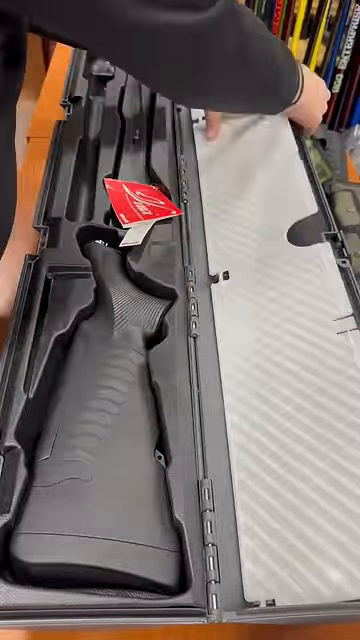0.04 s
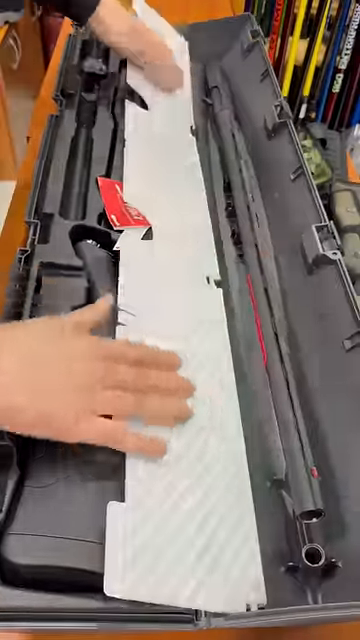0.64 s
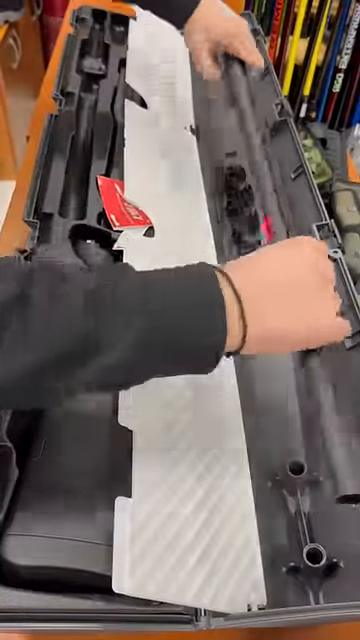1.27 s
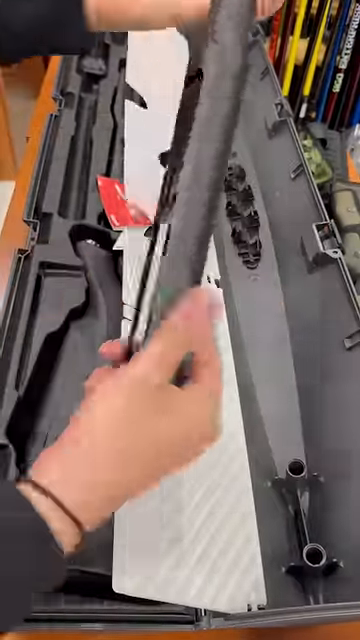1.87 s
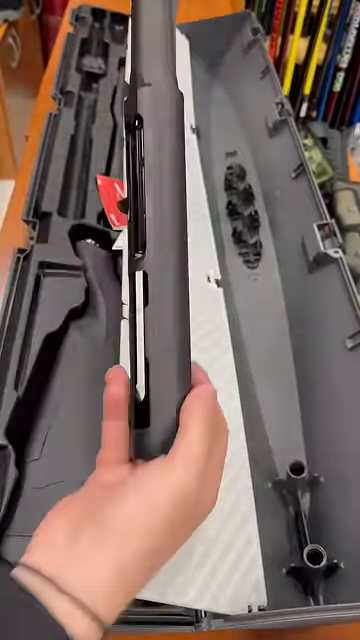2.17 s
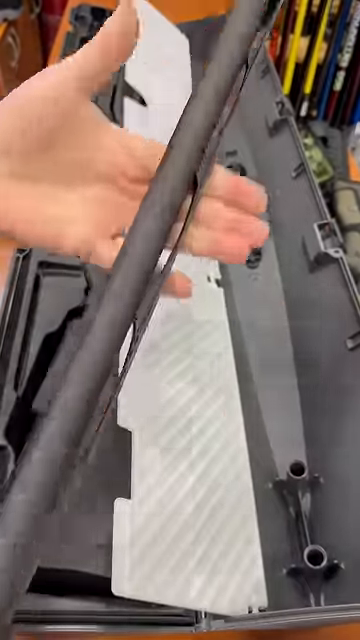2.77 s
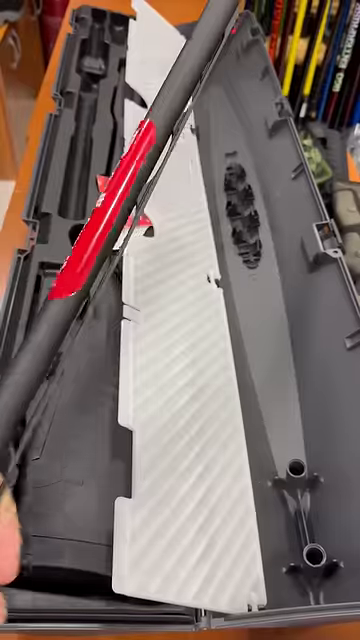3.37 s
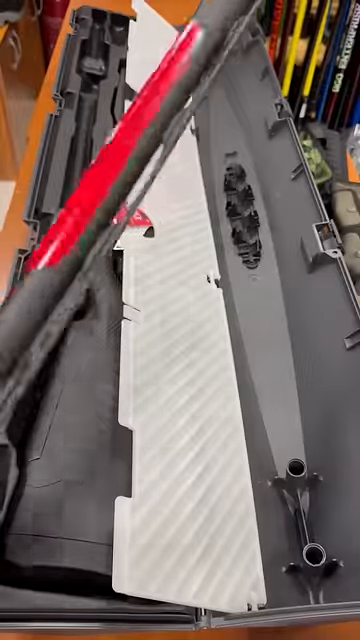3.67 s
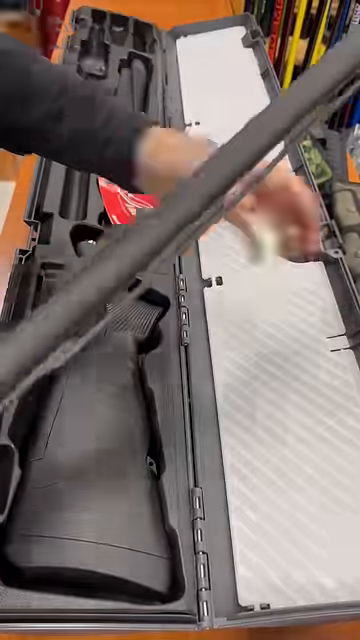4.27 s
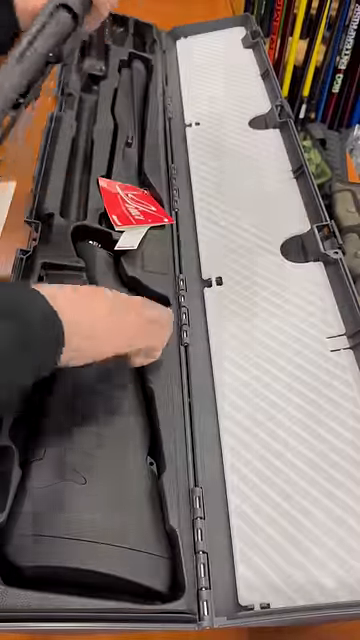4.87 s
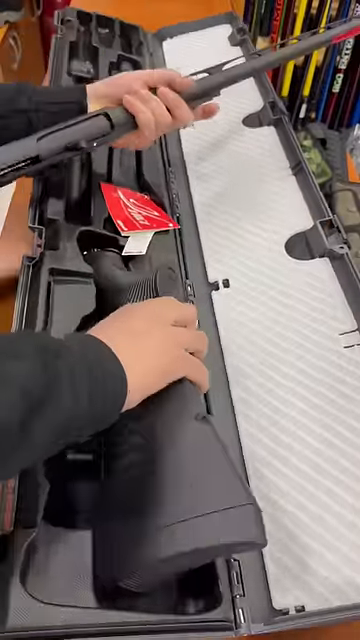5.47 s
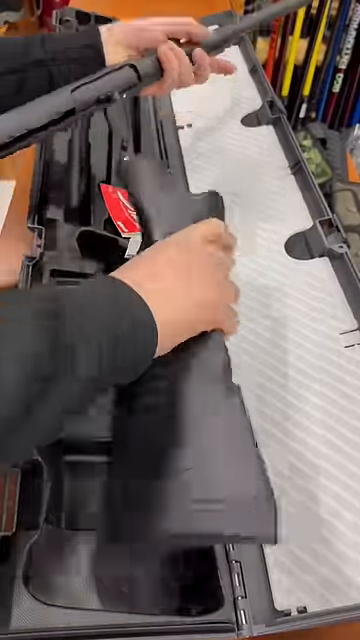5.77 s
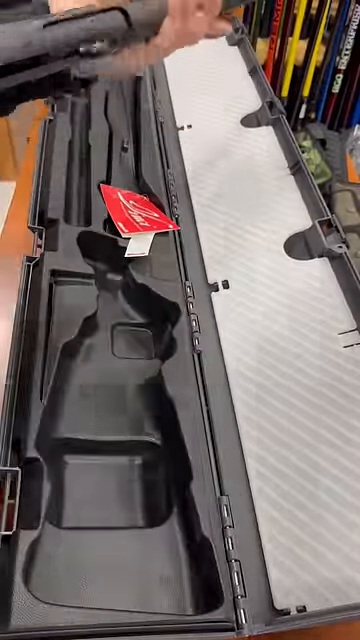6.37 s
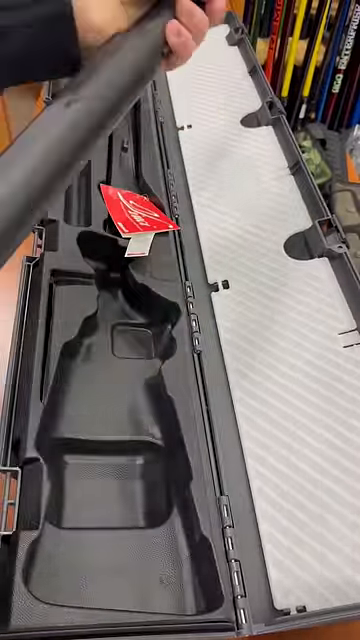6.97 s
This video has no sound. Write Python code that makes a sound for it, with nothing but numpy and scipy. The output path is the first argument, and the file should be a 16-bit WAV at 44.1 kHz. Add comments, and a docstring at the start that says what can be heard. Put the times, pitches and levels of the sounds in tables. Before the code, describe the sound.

At the start, a stiff divider sheet rubs and knocks in an open plastic gun case, slapping the lid sharply at 0.3 seconds and knocking again near 0.6. Light taps follow around 1 second. From 1.3 to 3.8 it is much quieter: hands and sleeve slide over a steel barrel with a soft hiss, dull bumps and, near 3.6, a few tiny clicks. From 3.9 the sheet scrapes and clatters back, landing with a loud slap and brief chatter at 4.2. Between 4.9 and 5.8 the stock is pulled from its tray with hollow knocks, rasps and short squeaks, loudest near 5.3. Hands rub again from 6, steel clicks near 6.5, and a sharp click with a knock lands at 7. Everything sounds close, with a brief shop echo and a faint, steady ventilation hum underneath.

```python
"""A moulded plastic gun case, open on a shop counter, cracks and rings under knocks: a stiff divider sheet
is flipped and slaps the lid, is flipped back, and the stock is pulled from its tray, scraping and rubbing.
Between the flips a steel barrel slides through the hands with a hiss of skin and sleeve and faint squeaks.
Small steel parts click. Case and clicks echo briefly in the shop, where a ventilation motor hums."""
import sys
import numpy as np
from scipy import signal
from scipy.fft import rfft, irfft
from scipy.io import wavfile

SR = 44100
rng = np.random.default_rng(int(sys.argv[2]) if len(sys.argv) > 2 else 0)


def wav_out(sig):
    """Save sig, one row per channel (or a flat mono array), as 16-bit PCM at SR to the path in sys.argv[1]."""
    wavfile.write(sys.argv[1], SR, np.round(np.clip(np.atleast_2d(sig).T, -1, 1) * 32767).astype(np.int16))


N = 310464
CUTOFF_HZ = 15900
EDGES_HZ = 31.25 * 2 ** np.arange(0, 9.1, .5)
CENTRES_HZ = np.sqrt(EDGES_HZ[1:] * EDGES_HZ[:-1])


def from_db(db):
    """Decibels to gain."""
    return 10 ** (np.asarray(db) / 20)


def unit_rms(x):
    """Scale to rms 1."""
    return x / np.sqrt(np.mean(x ** 2) + 1e-20)


def unit_energy(x):
    """Scale each row to energy 1."""
    return x / np.sqrt(np.sum(x ** 2, axis=-1, keepdims=True) + 1e-20)


def at_hz(points, hz):
    """Interpolate a table over log frequency."""
    freq_hz, value = np.transpose(points)
    return np.interp(np.log(hz), np.log(freq_hz), value)


def add(track, start_s, sound):
    """Mix a sound in at start_s."""
    at = max(round(start_s * SR), 0)
    track[..., at:at + sound.shape[-1]] += sound[..., :max(N - at, 0)]


def band(x, index):
    """Half-octave band-pass."""
    return signal.sosfilt(signal.butter(2, EDGES_HZ[index:index + 2], "band", fs=SR, output="sos"), x)


def drift(rate_hz):
    """Random curve through unit-variance knots."""
    knots = rng.standard_normal(2000)
    return np.interp(np.arange(N) / SR * rate_hz, np.arange(len(knots)), knots)


def swells(rows):
    """Pressure builds and lets go: one Hann window per row, 1.4 times its nominal length."""
    force = np.zeros(N)
    for middle_s, length_s, level_db in rows:
        window = signal.windows.hann(int(1.4 * length_s * SR))
        add(force, middle_s - .7 * length_s, from_db(level_db) * window)
    return force


def friction(slips_per_s, spread_db=0):
    """Two trains of tiny slips of uneven size."""
    slips = rng.random(N) < slips_per_s / SR
    sizes = from_db(spread_db * np.minimum(rng.exponential(1, N), 4))
    return slips * sizes * rng.standard_normal((2, N))


# stereo width: freq_hz, side_db
WIDTH = [(60, -35), (250, -27), (500, -16), (1200, -7), (2200, -10), (4000, -7), (8000, -7), (13000, -5)]
def stereo(mid, side, hz):
    """Mid and side to left and right."""
    width = from_db(at_hz(WIDTH, hz))
    return np.stack([mid + width * side, mid - width * side])


def coloured(pair, tone, wider_db=0):
    """Two independent noises to one stereo noise of the given spectrum, rms 1."""
    hz = np.maximum(np.fft.rfftfreq(N, 1 / SR), 1)
    mid, side = rfft(pair) * from_db(at_hz(tone, hz)) * (hz > 20) * (hz < CUTOFF_HZ)
    return unit_rms(irfft(stereo(mid, from_db(wider_db) * side, hz), N))


def place(rows, sounds, window_s=.01):
    """Mix each sound in at its row's start; energy 1 becomes that of rms 1 over window_s."""
    out = np.zeros((2, N))
    for k, row in enumerate(rows):
        add(out, row[0], sounds[:, k] * np.sqrt(window_s * SR))
    return out


def crack(rows, drive, tone, t60s, bend_s):
    """Dense, heavily damped modes; bending waves bring the lows later (rise time bend_s at 1 kHz)."""
    t, sounds = np.arange(SR // 8) / SR, 0
    for k, hz in enumerate(CENTRES_HZ):
        rise = 1 - np.exp(-(t / (bend_s * 1000 / hz)) ** 2)
        envelope = rise * from_db(-60 * t / at_hz(t60s, hz))
        mid, side = unit_energy(band(rng.standard_normal((2, len(rows), len(t))) * envelope, k))
        strength = from_db(drive(rows, hz) + at_hz(tone, hz))
        sounds = sounds + stereo(mid, side, hz) * strength[:, None]
    return place(rows, sounds)


def ring(rows, drive, modes, scatter_db, build_cycles):
    """Each blow rings the modes; random strengths and phases stand for where it lands."""
    t, sounds = np.arange(SR // 4) / SR, 0
    for hz, level_db, t60_s in modes:
        rise = 1 - np.exp(-t * hz / build_cycles)
        envelope = unit_energy(rise * from_db(-60 * t / t60_s))
        phase_cycles = hz * t + rng.random((2, len(rows), 1))
        mid, side = np.sqrt(2) * envelope * np.sin(2 * np.pi * phase_cycles)
        strength = from_db(drive(rows, hz) + level_db + scatter_db * rng.standard_normal(len(rows)))
        sounds = sounds + stereo(mid, side, hz) * strength[:, None]
    return place(rows, sounds)


# air spectrum: freq_hz, gain_db
AIR_TONE = [(25, -39.5), (50, -26), (75, -7), (110, -6.5), (200, -5), (300, -12.5), (500, -18.5),
            (800, -25.5), (1100, -36.5), (1500, -37.5), (2200, -43.5), (7000, -50.5), (12000, -56.5),
            (16000, -59)]
# motor overtones: pitch_hz, rms_db
HUM = [(83.8, -59.5), (122, -61), (168, -68.5), (226, -72.5), (250.6, -71.5), (334, -73.5), (424.5, -76),
       (501, -84), (585, -82)]
def ventilation(motor_hz=40.9, motor_db=-68, waver_db=1.5, wander_rad=.7):
    """A steady motor note and wavering overtones over a soft rush of air."""
    t = np.arange(N) / SR
    hum = from_db(motor_db) * np.sin(2 * np.pi * motor_hz * t)
    for hz, rms_db in HUM:
        gain = from_db(rms_db + waver_db * drift(11))
        hum += gain * np.sin(2 * np.pi * hz * t + wander_rad * drift(8.2))
    air = from_db(-60) * coloured(rng.standard_normal((2, N)), AIR_TONE, wider_db=12.5)
    return np.sqrt(2) * hum + air


# echo decay: freq_hz, t60_s
SHOP_T60 = [(100, 0.4), (400, 0.2), (1500, 0.1), (5000, 0.24), (14000, 0.29)]
# echo strength: freq_hz, gain_db
SHOP_TONE = [(100, -7), (400, -8.5), (1500, -14.5), (5000, -13), (14000, -14)]
def shop_echo(x):
    """Short diffuse echo from counter and shelves, dying band by band."""
    t, echo = np.arange(SR // 2) / SR, 0
    arrival = np.clip((t - .006) / .0072, 0, 1)
    for k, hz in enumerate(CENTRES_HZ):
        envelope = arrival * from_db(-60 * t / at_hz(SHOP_T60, hz))
        mid, side = unit_energy(band(rng.standard_normal((2, len(t))) * envelope, k))
        band_share = np.sqrt(2 * (EDGES_HZ[k + 1] - EDGES_HZ[k]) / SR)
        echo = echo + stereo(mid, side, hz) * band_share * from_db(at_hz(SHOP_TONE, hz))
    return signal.fftconvolve(x.mean(axis=0, keepdims=True), echo, axes=1)[:, :N]


# handling bumps: middle_s, length_s, level_db
BUMPS = [(2.18, 0.12, -51.5), (2.73, .1, -52), (3.06, 0.13, -52.5), (3.61, .1, -53), (4.5, 0.19, -54),
         (6.23, 0.089, -49.5), (6.55, 0.14, -53)]
def bumps():
    """Handling makes soft swells of low noise."""
    tone_hz_db = [(100, -24), (165, 3), (205, 4), (300, -15), (1000, -61)]
    return swells(BUMPS) * coloured(rng.standard_normal((2, N)), tone_hz_db)


# squeaks: middle_s, length_s, pitch_hz, relative_db
SQUEAKS = [(0.145, 0.017, 4170, -37), (1.807, .06, 3100, -73.5), (0.583, 0.0075, 3630, -38.5),
           (4.063, 0.019, 1380, -39.5), (5.023, 0.0047, 2250, -34), (5.252, 0.058, 2720, -45.5),
           (5.798, .03, 2920, -75), (5.93, 0.052, 3050, -68), (6.086, 0.038, 3000, -63.5)]
def squeaks(half_width_hz=300):
    """Fingers and plastic edges stick and slip at a loosely held pitch."""
    out = 0
    for middle_s, length_s, hz, db in SQUEAKS:
        narrow = signal.butter(2, [hz - half_width_hz, hz + half_width_hz], "band", fs=SR, output="sos")
        squeal = unit_rms(signal.sosfilt(narrow, rng.standard_normal(N)))
        out = out + swells([(middle_s, length_s, db)]) * squeal
    return from_db(5.5) * out


# strokes over the matte finish: middle_s, length_s, relative_db, grip_offset_db
STROKES = [(0.041, 0.057, -67, 11.5), (0.48, 0.19, -69, 5.5), (0.915, .2, -76, 1),
           (1.345, 0.19, -72.5, -1.5), (1.573, 0.082, -66, -7), (1.766, 0.25, -68, -4.5),
           (1.967, 0.3, -59, -11.5), (2.293, 0.16, -61.5, -16), (3.014, 0.12, -68.5, -16),
           (3.603, 0.22, -72, -17), (3.695, 0.17, -69, 10), (4.17, .3, -79, 14.5), (4.425, 0.15, -66, -0.5),
           (4.653, .13, -63.5, -7.5), (4.944, 0.22, -75.5, 11), (5.427, 0.076, -72, 9.5),
           (5.715, 0.44, -72, 0.5), (5.924, 0.087, -69, 3), (6.107, 0.22, -58.5, 1),
           (6.33, 0.21, -68.5, 4.5), (6.612, 0.077, -65.5, 3), (6.8, 0.29, -73.5, 5)]
# barrel turning in the palm: middle_s, length_s, level_db
TURNS = [(1.68, 0.17, -75), (2.0, 0.56, -69), (2.65, 0.24, -70)]
# slide, grip and palm spectra: freq_hz, gain_db
HISS_TONE = [(1000, -38.5), (4000, -15), (7000, -5), (8300, -8), (10500, 3), (13000, 0.5), (15500, -1),
             (16000, -4)]
GRIP_TONE = [(600, 3), (2000, -1.5), (3000, 0.5), (4200, -1), (6000, -1.5), (9000, -15), (16000, -29.5)]
PALM_TONE = [(200, -14), (600, 5), (1400, -6.5), (2200, -26), (6000, -30)]
def hands(rough_db=3, catch_rate_hz=66):
    """Skin and sleeve catch and slide: fine hiss, coarser under a tight grip, and dull palm rubs."""
    catching = from_db(rough_db * drift(catch_rate_hz))
    slide_force = swells([(s, length_s, db) for s, length_s, db, _ in STROKES])
    grip_force = swells([(s, length_s, db + grip_db) for s, length_s, db, grip_db in STROKES])
    hiss = slide_force * coloured(rng.standard_normal((2, N)), HISS_TONE)
    grip = grip_force * coloured(friction(slips_per_s=3900), GRIP_TONE)
    palm = swells(TURNS) * coloured(rng.standard_normal((2, N)), PALM_TONE, wider_db=11)
    return catching * (from_db(2) * hiss + from_db(-2) * grip + palm)


def click_drive(rows, hz, floor_hz=1400, pivot_hz=4200):
    """Drive of each click at hz, in dB: smaller parts are brighter."""
    _, db, brightness = np.transpose(rows)
    return db + brightness * np.log2(max(hz, floor_hz) / pivot_hz)


# steel contacts: start_s, drive_db, brightness_db_per_octave
CLICKS = [(3.4477, -79, 7.5), (3.6385, -57.5, 2), (3.6831, -57, -4.5), (3.726, -58, -6), (3.7405, -63, -5),
          (4.4698, -45, 4), (4.6908, -52, -3), (4.7133, -58.5, -8.5), (6.4708, -49.5, 3.5),
          (6.4862, -44, 0), (7.0168, -38, 4.5)]
# steel modes: pitch_hz, gain_db, t60_s
STEEL_MODES = [(756, -22, 0.019), (1600, -14, 0.005), (2020, -14.5, 0.027), (3014, -8, 0.047),
               (3800, -15, 0.017), (4030, -31, 0.016), (5030, -12, 0.0096), (5460, -17, 0.015),
               (7030, -17, 0.0099), (10930, -11, 0.011), (12200, -19, 0.01)]
# click spectrum: freq_hz, gain_db
STEEL_TONE = [(100, -29.5), (500, -35), (1500, -11.5), (2200, -4.5), (3200, 7.5), (5500, 1.5), (8200, -8),
              (11000, 4.5), (16000, 0)]
# click decay: freq_hz, t60_s
STEEL_T60 = [(500, 0.051), (3000, 0.011), (6000, 0.05), (14000, 0.02)]
def steel():
    """Loose steel parts tap each other, damped by the hand, slightly left of centre."""
    cracks = from_db(-3) * crack(CLICKS, click_drive, STEEL_TONE, STEEL_T60, bend_s=.001)
    pings = from_db(2) * ring(CLICKS, click_drive, STEEL_MODES, scatter_db=6, build_cycles=2.5)
    return from_db([[.9], [-.9]]) * (cracks + pings)


# rubbing envelopes, one list per move: time_s, relative_db
RUBBING = [
    [(0.0, -39), (0.17, -58.5), (0.306, -69.5), (0.472, -58.5), (0.54, -51.5), (0.67, -74), (0.8, -77.5)],
    [(3.85, -73.5), (3.932, -66), (3.99, -47), (4.12, -46.5), (4.17, -65), (4.322, -57), (4.45, -75)],
    [(4.8, -87), (4.918, -62.5), (5.038, -46.5), (5.118, -55), (5.534, -49.5), (5.592, -44), (5.726, -67),
     (5.85, -86)],
]
# rubbing spectrum: freq_hz, gain_db
RUB_TONE = [(100, 1.5), (400, 5), (700, -0.5), (1100, 4), (1900, -5.5), (3000, -18), (6000, -27),
            (16000, -41.5)]
def rubbing():
    """Sheet and stock rub lightly in the case."""
    t = np.arange(N) / SR
    force = sum(from_db(np.interp(t, *np.transpose(move), left=-140, right=-140)) for move in RUBBING)
    return from_db(-1.5) * force * coloured(friction(slips_per_s=3600, spread_db=2), RUB_TONE)


# plastic on plastic: middle_s, length_s, relative_db
SCRAPES = [(.148, 0.017, -25.5), (.94, 0.11, -65), (1.06, 0.27, -72), (5.27, 0.075, -41),
           (5.638, 0.031, -46.5)]
# scrape spectrum: freq_hz, gain_db
SCRAPE_TONE = [(100, -11.5), (500, 0), (1500, 8), (2500, -5.5), (4500, -2.5), (8300, -14), (12000, -10.5),
               (16000, -18)]
def scrapes():
    """An edge drags along the tray in short rasps."""
    return from_db(2) * swells(SCRAPES) * coloured(friction(slips_per_s=8700), SCRAPE_TONE)


# runs of taps: start_s, gap_s, first_drive_db
CHATTERS = [(0.285, 0.025, -43), (0.99, .04, -50), (3.966, 0.018, -44), (4.264, .022, -35),
            (4.888, 0.024, -41)]
def chatter_taps(count=5, loss_db=3.5, weight_db=-4, softness_db_per_octave=11.5):
    """A disturbed part chatters to rest: knock rows, unevenly spaced and ever weaker."""
    jitter = rng.uniform(-.1, .32, (len(CHATTERS), count))
    jitter[:, 0] = 0
    return [(start_s + gap_s * (k + jitter[i, k]), db - loss_db * k, weight_db, softness_db_per_octave)
            for i, (start_s, gap_s, db) in enumerate(CHATTERS) for k in range(count)]


def knock_drive(rows, hz, panel_hz=480, wall_hz=1400, tick_hz=5000):
    """Drive of each knock at hz, in dB: weight bends the broad panels, soft contact loses treble."""
    _, db, weight_db, softness = np.transpose(rows)
    bass_octaves = max(np.log2(panel_hz / hz), 0)
    treble_octaves = np.log2(np.clip(hz, wall_hz, tick_hz) / wall_hz)
    top_octaves = max(np.log2(hz / tick_hz), 0)
    panel_share = np.clip(np.log(wall_hz / hz) / np.log(wall_hz / panel_hz), 0, 1)
    panel_share *= max(1 - .35 * bass_octaves, 0)
    loss_db = 7.5 * bass_octaves + softness * treble_octaves + 6.5 * top_octaves
    return db + weight_db * panel_share - loss_db


def resonate(x, modes, lift_db):
    """A body lifts friction noise at each of its modes."""
    out = x
    for hz, db, t60_s in modes:
        width_hz = np.log(1000) / (np.pi * t60_s)
        peak = signal.iirpeak(hz, hz / width_hz, fs=SR)
        out = out + from_db(lift_db + db) * signal.lfilter(*peak, x + 1e-18)
    return out


# knocks: start_s, drive_db, weight_db, softness_db_per_octave
# sheet flipped 0-0.7 s, barrel lifted 0.9-1.6 s, sheet back 3.9-4.4 s,
# stock pulled out 4.9-6 s, stock meets receiver 7 s
KNOCKS = [ (0.0464, -30.5, -16, 16), (0.102, -28.5, -15, 10), (0.1294, -34, 9, 0.5),
          (0.155, -36.5, 16.5, 1.5), (0.2048, -21, -12.5, 19.5), (0.2619, -12, -3, 9.5),
          (0.5631, -29.5, -4.5, 6), (0.582, -23.5, -6, 12), (0.674, -55, 21.5, 13), (0.8959, -50, -14, 9.5),
          (0.91, -47.5, 4.5, 7), (0.9602, -51.5, -3, 4), (1.644, -66, 6, 4.5), (3.9245, -42, 17.5, 11.5),
          (3.9461, -34, 4.5, 14), (4.0141, -41.5, 5.5, 26), (4.0554, -33, -2.5, 25.5),
          (4.0847, -30, -9.5, 10.5), (4.228, -27.5, -5, 4.5), (4.2367, -15.5, -3.5, 12.5),
          (4.2429, -26, 18, 3), (4.3537, -69, -2.5, 10), (4.8656, -36, 5, 12), (4.9578, -41.5, 8.5, 23),
          (4.997, -34.5, 2, 10.5), (5.0219, -49.5, 11, 2), (5.0422, -31, -10.5, 3),
          (5.0782, -35.5, -13, 4.5), (5.092, -33, 7.5, 10), (5.107, -26.5, 9, 11), (5.2486, -29, 1.5, 6.5),
          (5.264, -28, -7, 22), (5.2765, -16, -11.5, 14), (5.3022, -28.5, 13, 7), (5.3338, -30.5, 6, 22),
          (5.4242, -34, -0.5, 22), (5.478, -40.5, 4.5, 25), (5.5547, -28.5, 2.5, 10),
          (5.5863, -35.5, 0.5, 7.5), (5.658, -34.5, -4, 14), (5.714, -32.5, -1, 16.5),
          (6.0036, -57, -17, 0.5), (7.0168, -26, -13, 9.5)]
# modes of the hollow shell and its walls: pitch_hz, gain_db, t60_s
SHELL_MODES = [(131.4, -11, 0.1), (194.5, -2.5, 0.086), (237, -2.5, .09), (313, -12, 0.076),
               (375.7, -4, 0.17), (512.5, -6.5, 0.021), (549, -2.5, 0.077), (649, -12.5, 0.043),
               (793, -6, 0.037), (956.3, -9, 0.0568), (1187, -11, 0.043), (1381, -13.5, 0.036),
               (1513, -8.5, .035), (1650, -10.5, .035), (1775, -14.5, 0.036), (1927, -7, .04),
               (2235, -7.5, 0.031), (2454, -11, 0.041), (2730, -12.5, 0.027), (3370, -15, 0.039),
               (4118, -17, 0.026), (5200, -18.5, 0.031)]
# knock spectrum: freq_hz, gain_db
CASE_TONE = [(45, -26.5), (80, 0.5), (120, 0.5), (200, -3), (400, -4), (650, -6), (1000, -0.5), (1700, -3),
             (2400, -2.5), (3400, -0.5), (5000, 0), (8300, -4.5), (12000, 6), (16000, -6)]
# knock decay: freq_hz, t60_s
CASE_T60 = [(100, 0.095), (400, 0.048), (1000, 0.035), (2000, 0.049), (4000, .02), (14000, 0.054)]
def case():
    """Knocks crack and ring in the plastic; rubbing and rasps sound through the same walls."""
    knocks = KNOCKS + chatter_taps()
    cracks = from_db(-7) * crack(knocks, knock_drive, CASE_TONE, CASE_T60, bend_s=.00098)
    rings = from_db(-3) * ring(knocks, knock_drive, SHELL_MODES, scatter_db=2, build_cycles=.34)
    body = cracks + rings + resonate(rubbing() + scrapes(), SHELL_MODES, lift_db=6)
    # the case sounds little below 80 Hz
    return signal.sosfilt(signal.butter(3, 80, "high", fs=SR, output="sos"), body)


def scene():
    """Case and steel with their echo, plus handling, ventilation and faint microphone hiss."""
    struck = case() + steel()
    mic_hiss = from_db(-86) * rng.standard_normal((2, N))
    return struck + shop_echo(struck) + hands() + squeaks() + bumps() + ventilation() + mic_hiss


def record(dry):
    """The microphone drops the deepest bass; the top is cut steeply."""
    thin = signal.sosfilt(signal.butter(4, 34, "high", fs=SR, output="sos"), dry)
    return signal.sosfilt(signal.ellip(10, .2, 80, CUTOFF_HZ, fs=SR, output="sos"), thin)


dry = scene()
out = record(dry)
wav_out(out)
```